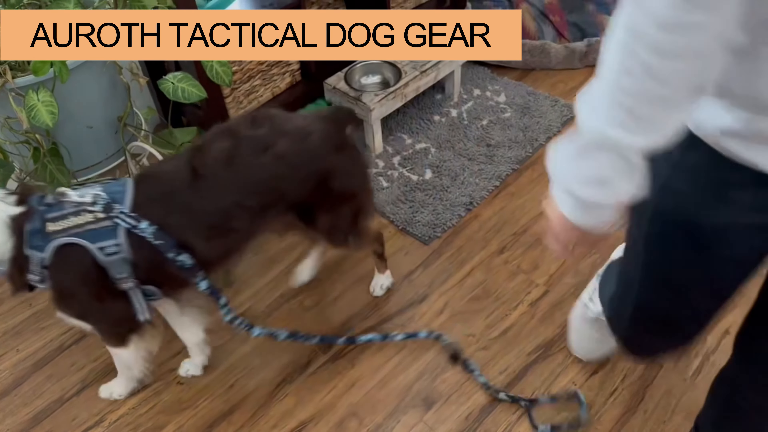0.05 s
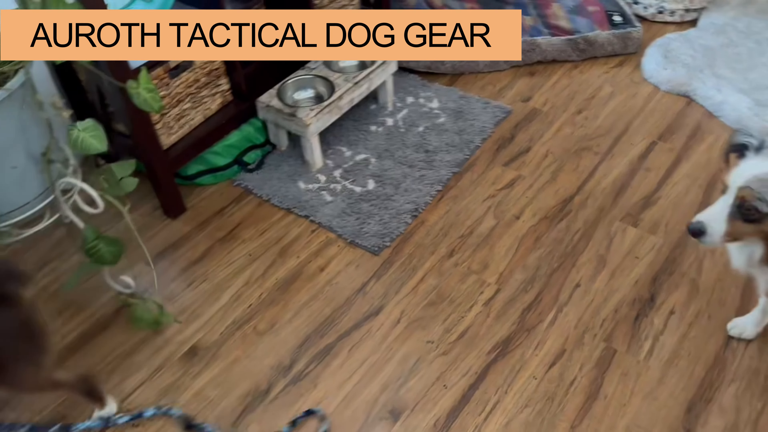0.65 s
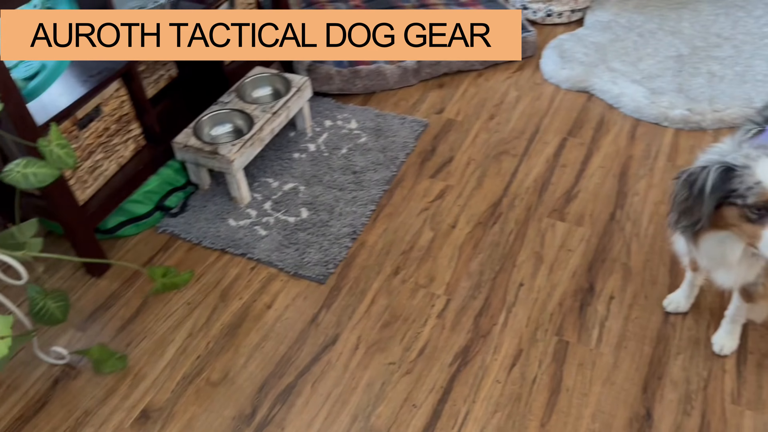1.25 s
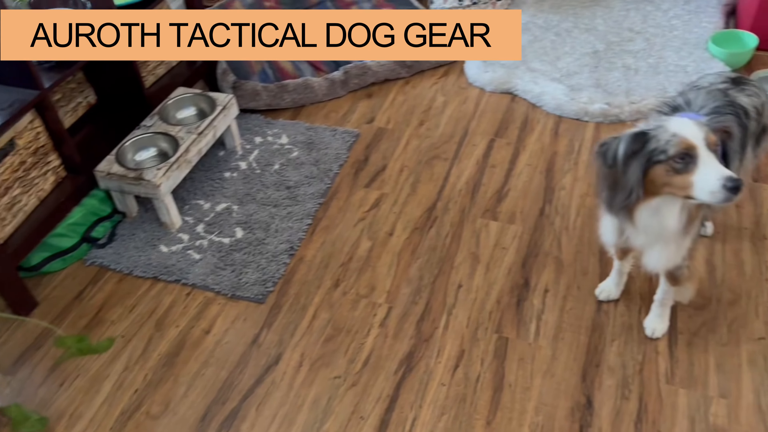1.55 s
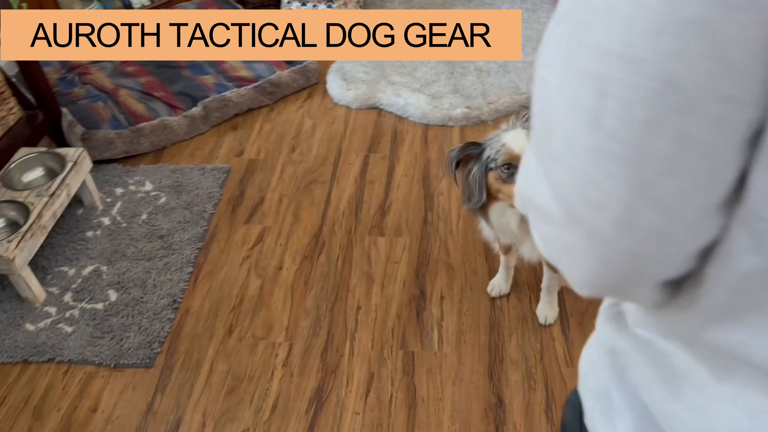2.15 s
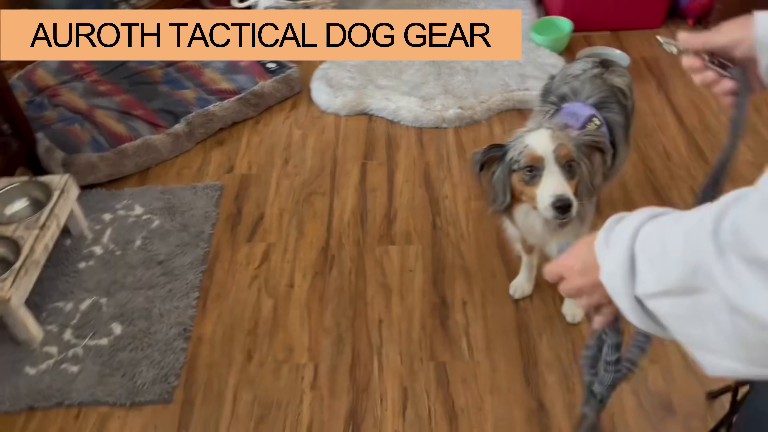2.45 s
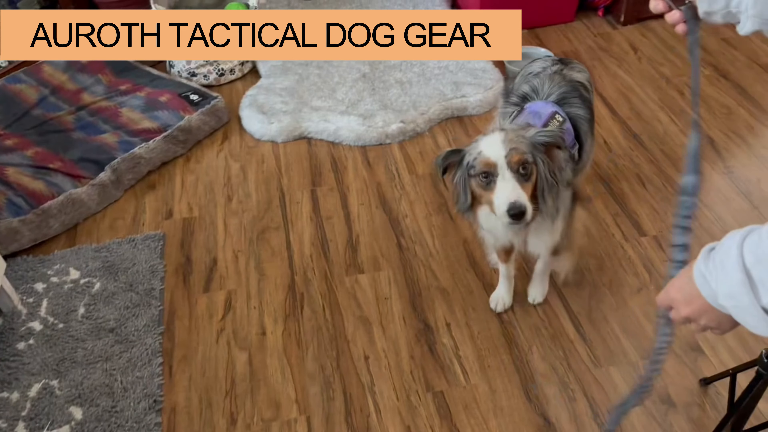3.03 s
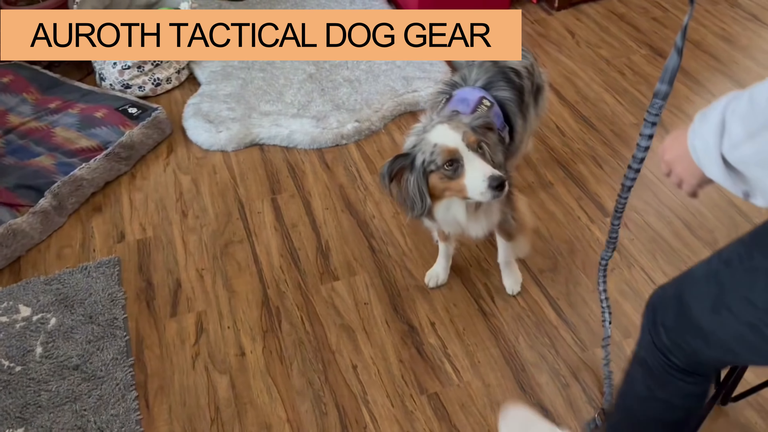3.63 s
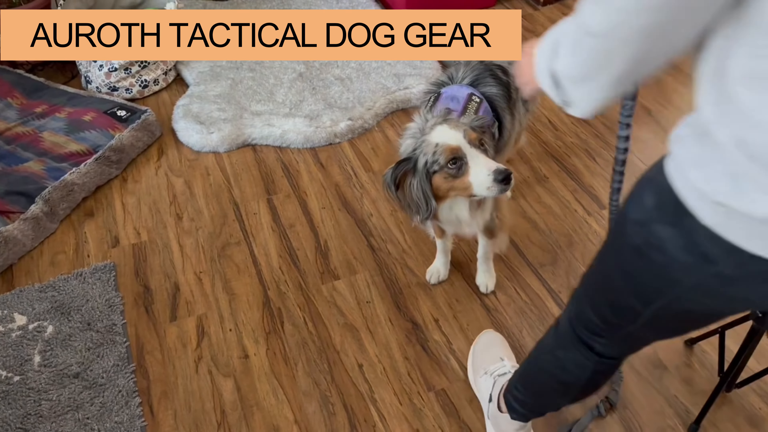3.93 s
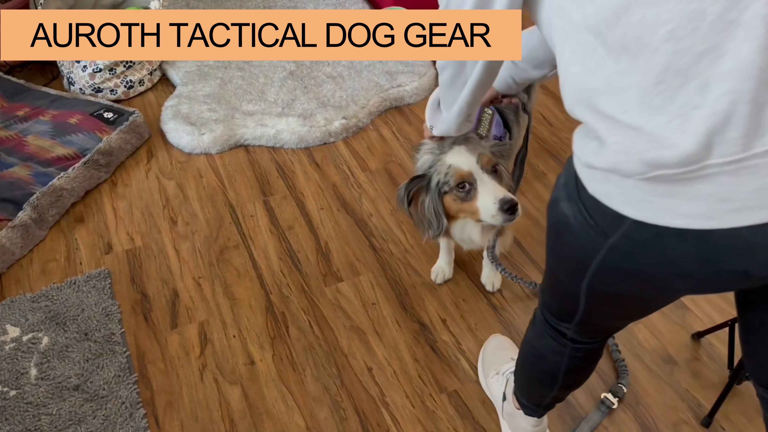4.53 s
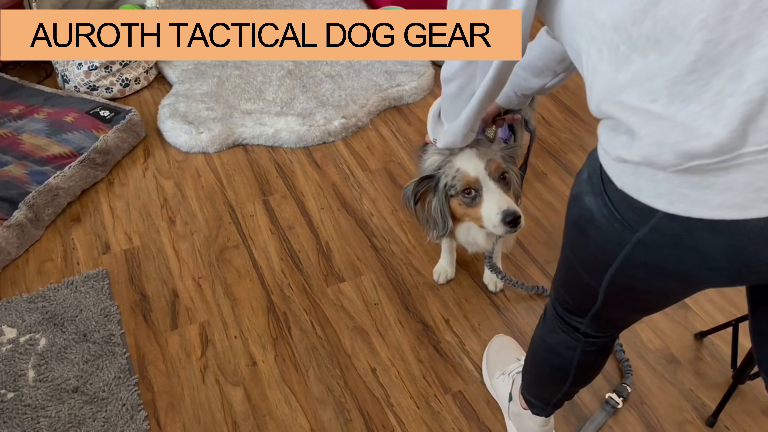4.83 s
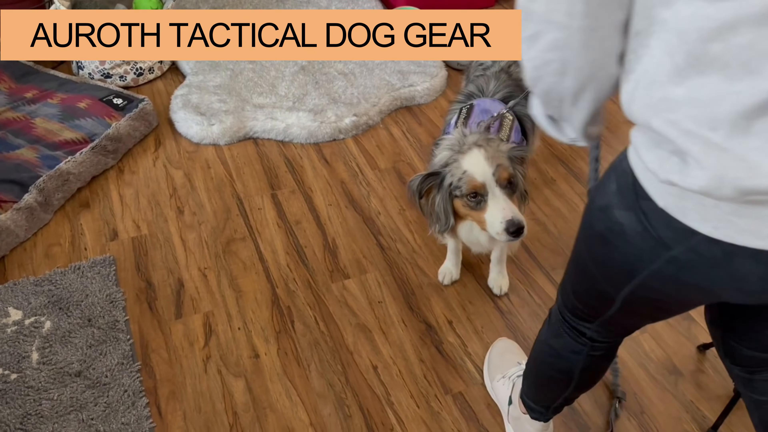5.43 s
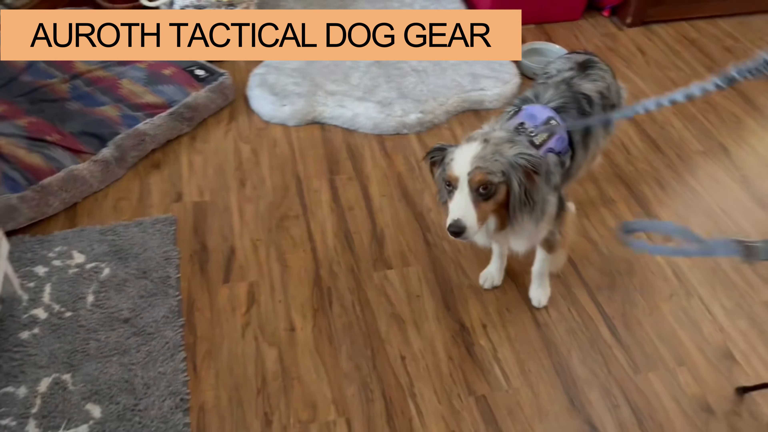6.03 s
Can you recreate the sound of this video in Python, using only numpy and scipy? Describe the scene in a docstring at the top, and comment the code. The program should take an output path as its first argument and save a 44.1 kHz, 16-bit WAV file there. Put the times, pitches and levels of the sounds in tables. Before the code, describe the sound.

In a small room, a dog walks away across a wooden floor, claws ticking and its nylon leash rasping along behind. A person then steps over with faintly rustling clothes and lets out a second leash, whose buckle knocks on the boards. Near the end a metal hook fumbles lightly at a harness and snaps shut. It is heard from nearby on a hand-held stereo microphone, over a low rumble.

```python
"""A small live room with a wooden floor, heard from nearby on a hand-held stereo microphone.
First a dog walks off, claws ticking on the boards, its nylon leash rasping along behind it.
Then a person steps across with rustling clothes and pays out a second leash, whose buckle knocks
on the floor at about 3 s. Last, its metal hook fumbles at another dog's harness and snaps shut
just after 5 s. A low rumble of room and hand lies under it all."""
import sys
import numpy as np
from scipy import signal
from scipy.fft import rfft, irfft
from scipy.io import wavfile
from scipy.ndimage import uniform_filter1d

SR = 44100
rng = np.random.default_rng(int(sys.argv[2]) if len(sys.argv) > 2 else 0)


def file_out(sig):
    """Save sig as 16-bit WAV at sys.argv[1]."""
    # one column per channel
    cols = np.atleast_2d(sig).T
    # limit, then scale
    lim = np.clip(cols, -1, 1)
    pcm = np.round(lim * 32767).astype(np.int16)
    wavfile.write(sys.argv[1], SR, pcm)


N = 276507
TIME, FREQS = np.arange(N) / SR, np.fft.rfftfreq(N, 1 / SR)

# Footfalls. Each row: start in seconds, level in dB, pitch the boards settle to in Hz,
# share by which the pitch starts higher, level of the deep thud in dB.
FOOTFALLS = [(.105, -38.5, 251, 0.31, -51), (.315, -53.5, 283, 0.16, -52), (0.487, -38.5, 266, 0.16, -59),
             (.507, -29.5, 165, 0.38, -63), (0.65, -44, 149, 0.47, -59), (1.031, -62, 130, 0.16, -43),
             (1.372, -32.5, 159.5, 1.38, -55), (2.051, -40.5, 131, 0.22, -62),
             (2.068, -52.5, 259, 0.086, -55), (2.304, -46.5, 263, 0.063, -42.5),
             (2.52, -42.5, 266, .1, -48.5), (2.578, -47, 228, 0.3, -43), (2.988, -35.5, 136.5, 0.76, -45),
             (3.02, -36, 149, .9, -49), (3.542, -48.5, 111, 0.18, -75.5), (3.653, -49.5, 102, .5, -65),
             (3.742, -52, 153, 0.94, -68), (3.927, -31, 129.5, 2.93, -45), (5.498, -49, 84, 0.72, -44),
             (6.232, -54.5, 222, 0.42, -54)]
STEP_ATTACK_S = 0.0036


def amp(db):
    """Decibels to gain."""
    return 10 ** (np.asarray(db) / 20)


def unit(x):
    """Scales to rms 1."""
    return x / np.sqrt(np.mean(x ** 2) + 1e-20)


def read(points, hz):
    """Reads a table on a log-frequency axis."""
    f, value = np.transpose(points)
    return np.interp(np.log(hz + 1), np.log(np.abs(f) + 1), value)


def curve(rows):
    """Joins (seconds, value) points with straight lines, sample by sample."""
    return np.interp(TIME, *np.transpose(rows))


def waver(first_size, second_size):
    """Slow random motion of rms 1: noise smoothed twice, over these numbers of samples."""
    return unit(uniform_filter1d(uniform_filter1d(rng.standard_normal(N), first_size), second_size))


def add(mix, s, sound):
    """Mixes a sound in at s seconds."""
    part = mix[max(round(s * SR), 0):][:len(sound)]
    part += sound[:len(part)]


def click(colour, treble_db=0, size=2048):
    """Causal impulse of peak 1 with the given spectrum, tilted above 2 kHz."""
    hz = np.abs(np.fft.fftfreq(size, 1 / SR))
    log_gain = np.log(amp(read(colour, hz) + treble_db * hz ** 2 / (hz ** 2 + 2000 ** 2)))
    minimum_phase = np.exp(np.conj(signal.hilbert(log_gain)))
    pulse = np.fft.ifft(minimum_phase).real[:size // 2]
    return pulse / np.abs(pulse).max()


def ring(hz, t60):
    """One mode, dying by 60 dB in t60 seconds."""
    t = TIME[:SR // 2]
    return np.sin(2 * np.pi * hz * t) * np.exp(-np.log(1000) * t / max(t60, 1e-3))


def resonate(x, hz, width_hz):
    """A resonance of gain 1 that follows the curve hz."""
    turn = np.exp(2j * np.pi * np.cumsum(hz) / SR)
    pole = np.exp(-np.pi * width_hz / SR)
    return 2 * (turn * signal.lfilter([1 - pole], [1, -pole], x / turn)).real


def diffuse(pair, colour):
    """Colours two unrelated signals and makes them alike in the bass, as a sound field does."""
    # Likeness of the two channels. Each row: frequency in Hz, coherence.
    coherence = [(50, 0.94), (150, 0.71), (300, 0.51), (600, 0.24), (1200, 0.17), (2500, 0.13),
                 (5000, 0.067), (12000, 0.24)]
    same = np.clip(read(coherence, FREQS), -1, 1)
    a, b = rfft(pair) * amp(read(colour, FREQS))
    mid, side = irfft(a * np.sqrt(1 + same), N), irfft(b * np.sqrt(1 - same), N)
    return np.array([mid + side, mid - side]) / mid.std()


def friction(colour, per_s, spread_db, smooth, uneven_db):
    """A weave catches in clumps over a smooth rub; near surfaces comb the sound as it travels."""
    catches = (rng.random(N) < per_s / SR) * amp(spread_db * np.minimum(rng.exponential(1, N), 3))
    clumps = waver(500, 300)
    drive = unit(catches * rng.standard_normal((2, N))) + smooth * rng.standard_normal((2, N))
    spectra = signal.stft(drive * amp(uneven_db * clumps), nperseg=512)[2]
    comb = uniform_filter1d(rng.standard_normal(spectra.shape[1:]), size=2, axis=0)
    comb_db = 2.3 * unit(uniform_filter1d(comb, size=18, axis=1))
    combed = signal.istft(spectra * amp(comb_db), nperseg=512)[1][:, :N]
    return diffuse(combed, colour)


def swell(centre_s, length_s, db, shape=1.2):
    """Gain of one movement that gathers speed and slows again; shape 1 is pointed, 2 bell-shaped."""
    return amp(db) * np.exp(-np.minimum(np.abs(2 * (TIME - centre_s) / length_s) ** shape, 30))


def strokes(rub, rows, steady=0, treble_hz=1700, shape=1.31):
    """Plays a rubbing noise by a steady pull and by single strokes, each with its own brightness."""
    treble = signal.sosfiltfilt(signal.butter(2, treble_hz, "high", fs=SR, output="sos"), rub)
    low_power = sum(swell(s, length, db, shape) ** 2 for s, length, db, _ in rows)
    high_power = sum(swell(s, length, db + treble_db, shape) ** 2 for s, length, db, treble_db in rows)
    return (rub - treble) * np.sqrt(low_power + steady ** 2) + treble * np.sqrt(high_power + steady ** 2)


def pull():
    """Gain of the walking dog's pull on its leash: it rises, holds, then fades as the dog leaves."""
    hold_db, full_s, leave_s, fade_db_per_s = -46.5, 0.11, 1.327, 102
    rise = np.clip(1 + (TIME - full_s) / 0.089, .45, 1)
    return rise * amp(hold_db - fade_db_per_s * np.maximum(TIME - leave_s, 0))


def pause():
    """Gain of the faint rustle, which all but stops while the hook is lined up."""
    return amp(-26.5 * swell(centre_s=4.95, length_s=0.3, db=0))


def room(x, early_db, tail_db, early_s, left_lag_s=0):
    """Direct sound, a quick scatter from floor and furniture, and the room's tail."""
    # Reverberation. Each row: frequency in Hz, seconds to die by 60 dB.
    decay_times = [(100, 0.58), (250, 0.54), (700, 0.34), (2500, 0.4), (6000, 0.42), (10000, 0.25),
                   (16000, 0.084)]
    t = TIME[:SR * 3 // 4]
    taps = diffuse(rng.standard_normal((2, N)), [(20, 0.0007), (20000, 0.0061)])[:, :len(t)]
    taps *= 1 - np.exp(-t / 0.017)
    early = taps * np.exp(-t / early_s)
    hz, frame_s, spectra = signal.stft(taps[:, ::-1], SR, nperseg=256)
    decay = np.exp(-np.log(1000) * frame_s / read(decay_times, hz)[:, None])
    tail = signal.istft(spectra * decay, SR, nperseg=256)[1][:, :len(t)]
    tail *= 1 - np.exp(-t / 0.0031)
    response = amp(early_db) * early / np.linalg.norm(early[0])
    response += amp(tail_db) * tail / np.linalg.norm(tail[0])
    response[[0, 1], [round(left_lag_s * SR), 0]] += 1  # direct sound
    return signal.fftconvolve(x[None], response, axes=1)[:, :N]


def background():
    """Room and hand rumble in soft lumps, most while the microphone moves; the air hisses faintly."""
    # Spectra of rumble and air. Each row: frequency in Hz, level in dB.
    rumble_colour = [(15, 1.5), (35, 2.5), (60, -1), (100, -2), (160, -7.5), (250, -19), (400, -22),
                     (900, -40.5)]
    air_colour = [(120, -44.5), (200, 2.5), (412, -17), (946, -16), (3060, -23), (3350, -23.5),
                  (4240, -26), (15000, -39)]
    # Course of the rumble. Each row: time in seconds, level in dB.
    rumble_levels = [(0, -61.5), (1.3, -66.5), (1.7, -72), (2.3, -73), (2.7, -64), (3.7, -66), (4.3, -74.5),
                     (5.1, -75), (6.27, -67)]
    lumps_db = 2.2 * waver(4000, 2500)
    rumble = diffuse(rng.standard_normal((2, N)), rumble_colour)
    air = diffuse(rng.standard_normal((2, N)), air_colour)
    return rumble * amp(curve(rumble_levels) + 4.0 + lumps_db) + air * amp(-83.5)


def webbing():
    """Nylon and fur hiss faintly all along, more with the dragging leash, and in single brushes."""
    # Spectrum of the hiss. Each row: frequency in Hz, level in dB.
    hiss_colour = [(1500, -3), (3000, -3), (5000, -2.5), (7000, -1.5), (8300, -3), (10000, -2),
                   (12500, -7.5), (15500, -16)]
    # Brushes. Each row: centre in seconds, length in seconds, level in dB.
    brushes = [(0.053, 0.044, -61), (0.626, 0.074, -64), (1.256, 0.081, -46), (1.4, 0.11, -60.5),
               (1.65, 0.054, -70), (1.898, 0.05, -66.5), (2.164, 0.14, -68.5), (2.55, 0.13, -62.5),
               (3.057, 0.19, -61.5), (3.275, 0.45, -70.5), (3.532, .06, -69), (3.681, 0.055, -62),
               (4.034, 0.17, -75), (5.171, 0.019, -49), (5.3, 1, -71.5), (5.837, 0.87, -72),
               (6.25, 0.16, -68)]
    hiss = friction(hiss_colour, per_s=1700, spread_db=4.0, smooth=1.8, uneven_db=1.0)
    power = amp(-81) ** 2 + (amp(-21.5) * pull()) ** 2 + sum(swell(*row) ** 2 for row in brushes)
    return hiss * np.sqrt(power) * pause()


def rubbing():
    """The second leash slides over the boards, a shoe skims the floor, sleeves and trousers rustle."""
    # Spectra of the three rubs. Each row: frequency in Hz, level in dB.
    leash_colour = [(120, -23.5), (220, -5), (400, -6.5), (540, 3), (900, 0), (1250, -3), (1550, -5),
                    (2200, -10), (2800, -8.5), (3700, -17.5), (6600, -29.5), (10500, -28.5), (15000, -48)]
    shoe_colour = [(180, -15), (300, -10), (550, -12), (800, -3.5), (950, -4), (1250, -8.5), (1700, -15.5),
                   (2500, -19), (5000, -27.5), (10600, -37), (15000, -50)]
    cloth_colour = [(150, -7), (280, 1.5), (420, -1.5), (650, -2), (1000, -4.5), (1500, -5), (3000, -11),
                    (6000, -18), (10000, -23.5)]
    # Their movements. Each row: centre in seconds, length in seconds, level in dB, extra treble in dB.
    slides = [(2.68, 0.16, -54, 0), (2.798, 0.16, -51.5, -1.5), (2.984, 0.028, -54, -10),
              (3.023, 0.018, -40.5, 5), (3.079, .12, -55.5, 13), (3.229, 0.19, -50, 4.5),
              (5.446, .016, -59, 11), (5.489, 0.074, -59, -1.5)]
    scuffs = [(3.82, 0.1, -59.5, 3), (3.909, 0.13, -51, 1)]
    rustles = [(1.925, 0.32, -72, -6), (2.13, 0.17, -76, 5), (2.497, 0.36, -70.5, 2),
               (4.569, 0.11, -75.5, -1.5), (5.096, 0.24, -74.5, -2), (5.23, 0.12, -76, -18),
               (5.593, 0.29, -70.5, 0), (5.897, 0.11, -70.5, -4), (6.247, 0.32, -70, -8)]
    leash = friction(leash_colour, per_s=1700, spread_db=-0.5, smooth=1.2, uneven_db=0.5)
    leash = strokes(leash, slides, treble_hz=1714) * amp(4.0)
    shoe = friction(shoe_colour, per_s=2500, spread_db=4.5, smooth=1.6, uneven_db=1.5)
    shoe = strokes(shoe, scuffs) * amp(-1.6)
    cloth = friction(cloth_colour, per_s=3400, spread_db=1.5, smooth=1.44, uneven_db=1.7)
    cloth = strokes(cloth, rustles, steady=amp(-85) * pause()) * amp(5.5)
    return (leash + shoe + cloth) * amp([[.9], [-.9]])


def floor_shudder():
    """Each footfall shakes the whole floor in a short dull burst."""
    # The floor's many small modes. Each row: frequency in Hz, level in dB.
    floor_colour = [(30, -5.5), (75, -13), (130, 0.5), (200, 2.5), (260, -2.5), (350, 0), (600, -15),
                    (1500, -39.5)]
    ring_s = 0.1
    shake, t = np.zeros(N), TIME[:SR // 2]
    burst = (1 - np.exp(-t / STEP_ATTACK_S)) * np.exp(-np.log(1000) * t / ring_s)
    for s, db, *_ in FOOTFALLS:
        add(shake, s, amp(db - 12.5) * burst)
    return diffuse(rng.standard_normal((2, N)), floor_colour) * shake * amp([[.7], [-.7]])


def footsteps():
    """Weight lands on the boards; fast bending waves arrive first, so each thump falls in pitch."""
    ring_s, fall_s, sag_delay_s = 0.08, .005, 0.0078
    out, t = np.zeros(N), TIME[:SR // 2]
    attack = 1 - np.exp(-t / STEP_ATTACK_S)
    envelope = attack * np.exp(-np.log(1000) * t / ring_s)
    thud = attack * ring(hz=43, t60=0.12)  # the joists sag just after the foot lands
    for s, db, hz, fall, thud_db in FOOTFALLS:
        phase = 2 * np.pi * np.cumsum(hz * (1 + fall * np.exp(-t / fall_s))) / SR
        boards = np.sin(phase) + 0.39 * np.sin(0.49 * phase) + 0.14 * np.sin(1.7 * phase)
        add(out, s, amp(db) * boards * envelope / envelope.max())
        add(out, s + sag_delay_s, amp(thud_db) * thud)
    return amp(-2.0) * room(out, early_db=-5, tail_db=-12.5, early_s=0.021) * amp([[.7], [-.7]])


def claw_ticks():
    """A claw or small leash fitting skids briefly and rings, and the wood gives a dry answer."""
    # Contacts. Each row: start in seconds, level in dB, ring in Hz, the wood's share in dB.
    ticks = [(0.1077, -31, 10250, -28), (0.156, -28.5, 4850, -17), (.3982, -34, 5170, -21),
             (0.8, -34.5, 10400, -23), (0.812, -33.5, 9400, -17), (.9404, -34, 7300, 3),
             (1.168, -34.5, 9900, -13), (1.2023, -36, 9050, -8), (1.236, -26, 9900, -15),
             (1.3715, -39, 4300, -3), (1.4734, -36.5, 3330, 3), (1.8017, -51, 6440, 8.5),
             (1.8897, -41, 4080, -8), (2.0477, -40, 4100, 9), (2.302, -45.5, 7140, 0.5),
             (2.3608, -38.5, 10000, -6), (2.379, -38.5, 4250, -6), (2.5635, -38.5, 5540, 3.5),
             (2.7628, -39, 10090, -14.5), (2.976, -36, 10500, 2), (3.0164, -30, 10150, -24.5),
             (3.324, -31, 10400, -21), (3.4943, -49.5, 5350, 6.5), (3.6472, -52.5, 9600, 6),
             (3.782, -38.5, 5200, 4.5), (3.9273, -41, 6220, 13)]
    # Spectra of the contact and of the wood. Each row: frequency in Hz, level in dB.
    edge_colour = [(1500, -10), (3500, 1), (6000, 0), (8500, -5), (10500, 0), (12500, -9.5), (16000, -9)]
    wood_colour = [(200, -22), (600, 0.5), (1200, -3.5), (3000, -15.5), (5000, -11), (9000, -21.5)]
    out, t = np.zeros(N), TIME[:SR // 100]
    edge, wood = click(edge_colour), click(wood_colour)
    for s, db, hz, wood_db in ticks:
        skid = rng.standard_normal(len(t)) * np.exp(-t / 0.0011)
        add(out, s, amp(db + 0.5) * np.convolve(edge, skid / np.linalg.norm(skid)))
        add(out, s, amp(db - 9) * ring(hz, t60=.004))
        add(out, s, amp(db + wood_db - 6) * wood)
    return room(out, early_db=2.5, tail_db=-0.5, early_s=0.0029)


def knocks():
    """A buckle or hard sole strikes a board and rebounds; board and buckle ring briefly."""
    # Strikes. Each row: start in seconds, then level, hardness, board's share and rebound, all in dB.
    strikes = [(.04, -33.5, -11, 0, -1), (0.1033, -26, -11, 15, -24), (0.108, -15.5, -10, -26, -11),
               (0.821, -25.5, -16, 8, -3.5), (1.236, -41, 8, 20.5, -14), (1.3723, -42.5, 2, 21.5, 3),
               (1.4735, -42, 6, 12, -25), (2.9718, -31.5, -8.5, 3.5, -11.5), (3.0165, -8, -6, -11.5, -24),
               (3.0259, -18, 10, -11, -11.5), (3.0595, -25.5, 6.5, -15.5, -9), (3.9271, -31, -31, 6.5, -28),
               (5.4454, -27, -3.5, -5, -1)]
    # Spectrum of the impact. Each row: frequency in Hz, level in dB.
    impact_colour = [(60, -15.5), (150, -3.5), (400, -1), (650, -8), (1000, 6.5), (1500, 1), (2200, 7.5),
                     (3100, -0.5), (4200, -3), (5500, -19.5), (8300, -25.5), (10400, -15), (12500, -38),
                     (15500, -23)]
    # Modes. Each row: frequency in Hz, level in dB, seconds to die by 60 dB.
    board_modes = [(674, -17.5, 0.041), (938, -21.5, 0.0095)]
    buckle_modes = [(2100, -31, 0.019), (2220, -31.5, 0.019), (2950, -24, 0.022), (2970, -19, 0.028),
                    (3700, -20, 0.01), (4380, -28, .008)]
    rebound_s = .005
    out = np.zeros(N)
    board = sum(amp(db) * ring(hz, t60) for hz, db, t60 in board_modes)
    for start, strike_db, hard_db, board_db, rebound_db in strikes:
        for s, db in (start, strike_db), (start + rebound_s, strike_db + rebound_db):
            buckle = sum(amp(mode_db) * ring(hz, t60) * rng.choice([-1, 1])
                         for hz, mode_db, t60 in buckle_modes)
            add(out, s, -amp(db - 3.5) * click(impact_colour, hard_db))
            add(out, s + 0.00033, amp(db + board_db) * board)
            add(out, s + 0.00037, amp(db + hard_db) * buckle)
    add(out, .0014, amp(-23) * out)  # reflection off a nearby surface
    return room(out, early_db=-1.5, tail_db=-4.5, early_s=0.0068) * amp([[.6], [-.2]])


def snap_hook():
    """The hook fumbles at the ring, then its sprung gate snaps; each touch wakes the modes anew."""
    # Touches. Each row: start in seconds, level in dB, main ring in Hz, its share in dB.
    touches = [(4.7837, -44, 1150, 5.5), (4.9985, -46.5, 7650, 13), (4.997, -52, 3610, 12.5),
               (5.055, -48, 5100, 3), (5.0562, -45.5, 1200, 6), (5.1053, -49.5, 9500, 15.5),
               (5.1707, -25, 8900, -1)]
    # The hook's modes. Each row: frequency in Hz, level in dB, seconds to die by 60 dB.
    hook_modes = [(2500, -11, .012), (3650, -3, .015), (4450, -2, .015), (5250, 0, .015), (7680, -2, .015),
                  (8080, -14, .25), (8850, -5, .05), (9850, -3, .02), (11150, -3, .015), (12500, -3, .01),
                  (14620, -2, .015)]
    # Spectrum of the contact. Each row: frequency in Hz, level in dB.
    edge_colour = [(200, -10.5), (1000, -5), (1500, -7.5), (2600, 3.5), (3600, -6), (5000, 0), (6500, -2),
                   (9000, 9), (12000, -1), (16000, -1)]
    out, t = np.zeros(N), TIME[:SR // 100]
    edge = click(edge_colour)
    for s, db, main_hz, main_db in touches:
        metal = sum(amp(mode_db + rng.uniform(-5, 5)) * ring(hz, t60) for hz, mode_db, t60 in hook_modes)
        chatter = rng.standard_normal(len(t)) * np.exp(-t / 0.0012)  # metal skids on metal
        add(out, s, amp(db + 9.5) * np.convolve(edge, chatter / np.linalg.norm(chatter)))
        add(out, s, amp(db - 24) * metal)
        add(out, s, amp(db + main_db - 7) * ring(main_hz, t60=.005))
    # The hook is nearer the right side of the microphone.
    return room(out, early_db=-6.5, tail_db=-6.0, early_s=0.0052, left_lag_s=.00018)


def dragged_leash():
    """Webbing rasps over the wood grain; its hollow resonance wanders and most tugs brighten it."""
    # Spectrum of the rasp. Each row: frequency in Hz, level in dB.
    rasp_colour = [(120, -35), (220, -9), (450, -7.5), (620, 0), (950, -0.5), (1500, -5.5), (2200, -9),
                   (3000, -13), (4500, -21), (7400, -30.5), (8300, -36.5), (10500, -30.5), (15000, -77)]
    # Path of the hollow resonance. Each row: time in seconds, frequency in Hz.
    hollow_path = [(0.02, 670), (0.11, 630), (0.242, 894), (0.632, 605), (0.986, 910), (1.026, 716),
                   (1.142, 980), (1.214, 730), (1.45, 656)]
    # Tugs. Each row: centre in seconds, length in seconds, level in dB, extra treble in dB.
    tugs = [(0.054, 0.035, -39.5, 2.5), (0.163, 0.09, -46.5, 7.5), (0.404, 0.091, -43.5, -5),
            (.64, 0.12, -39.5, 2), (0.844, 0.058, -44, 5.5), (0.978, 0.26, -54, 12),
            (1.248, 0.097, -42.5, 2)]
    rasp = friction(rasp_colour, per_s=2500, spread_db=-0.5, smooth=1.27, uneven_db=0.04)
    hollow_hz, width_hz = curve(hollow_path), 220
    hollow = resonate(resonate(rasp, hollow_hz, width_hz), hollow_hz, width_hz)
    taut = np.minimum(pull() / amp(-52), 1)  # a slack leash loses its hollow tone
    rasp = amp(-2.5) * (rasp + 0.62 * taut * hollow)
    return strokes(rasp, tugs, steady=pull(), treble_hz=1710, shape=2.8) * amp([[1.3], [-.7]])


def scene():
    """Everything in the room, as it reaches the microphone."""
    return (dragged_leash() + rubbing() + webbing() + knocks() + footsteps() + floor_shudder()
            + claw_ticks() + snap_hook() + background())


def record(dry):
    """The recorder's band limit: a steep low-pass at 15.9 kHz."""
    lowpass = signal.firwin(401, 15900, window=("kaiser", 8), fs=SR)
    return signal.oaconvolve(dry, lowpass[None], "same")


dry = scene()
out = record(dry)
file_out(out)
```